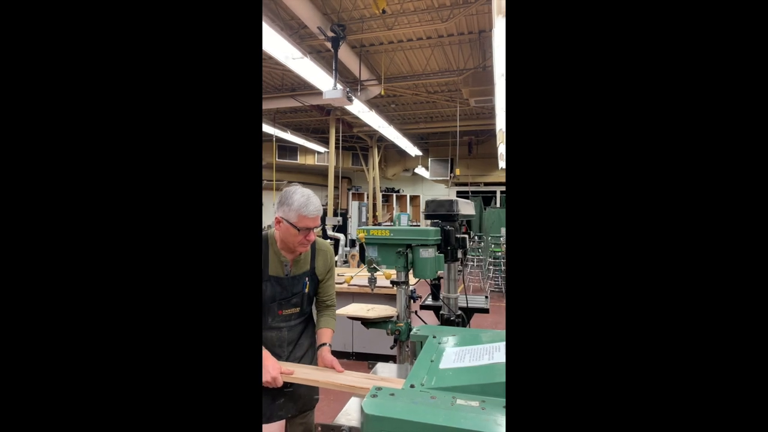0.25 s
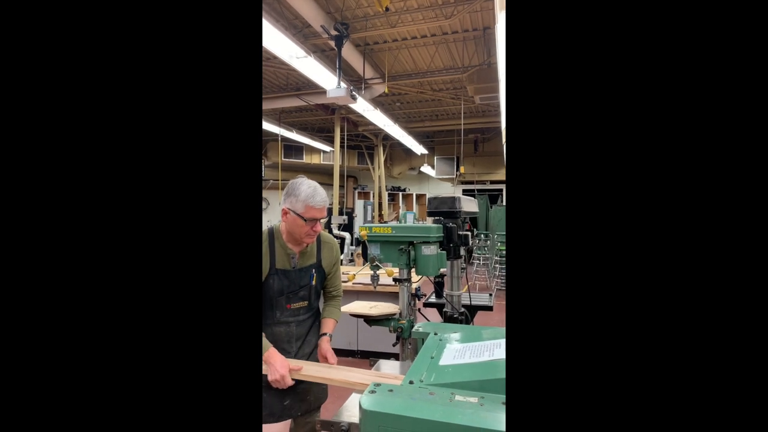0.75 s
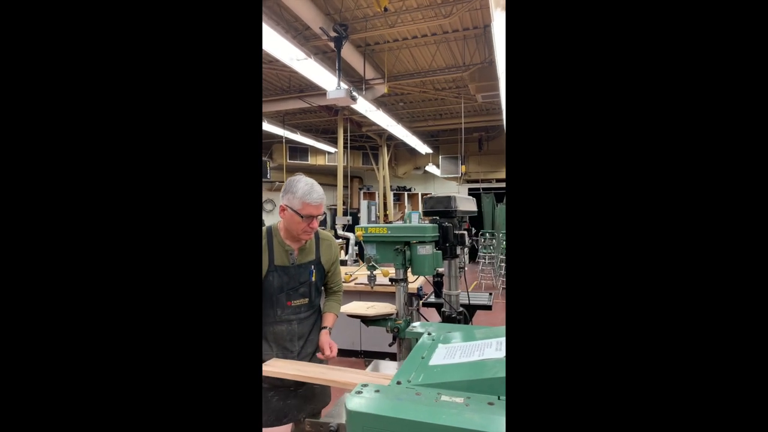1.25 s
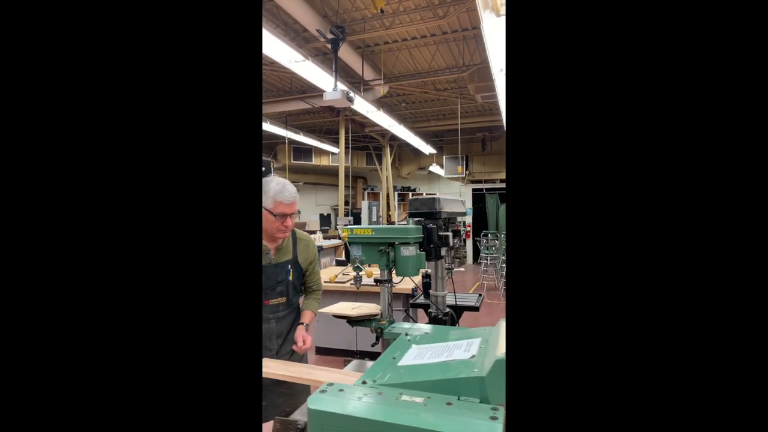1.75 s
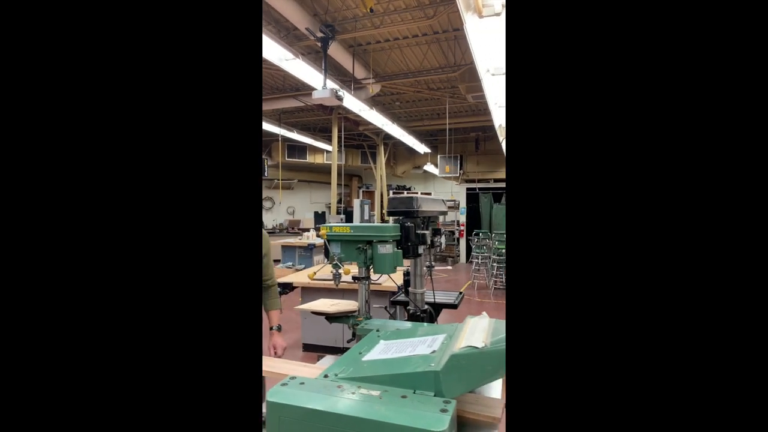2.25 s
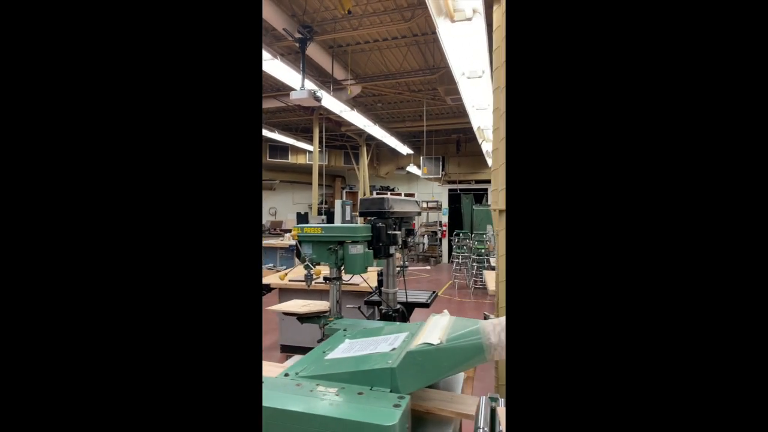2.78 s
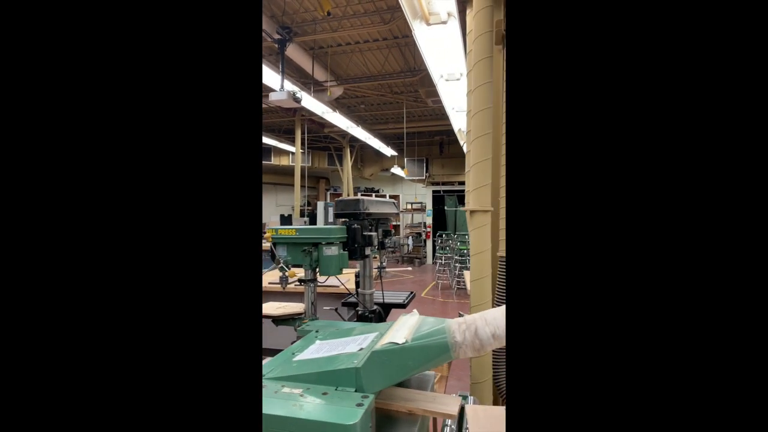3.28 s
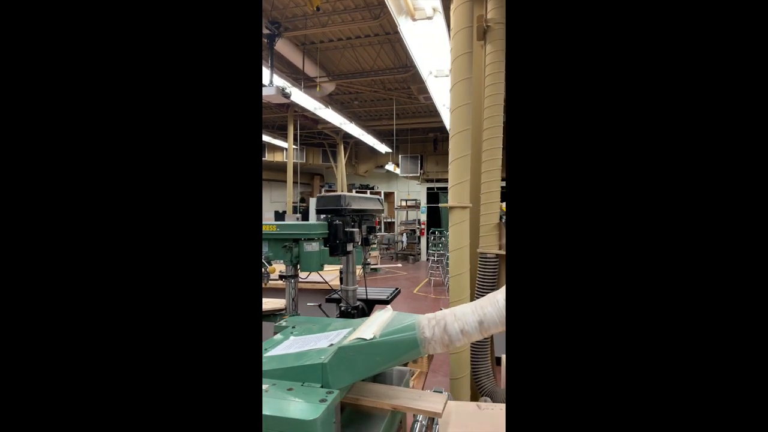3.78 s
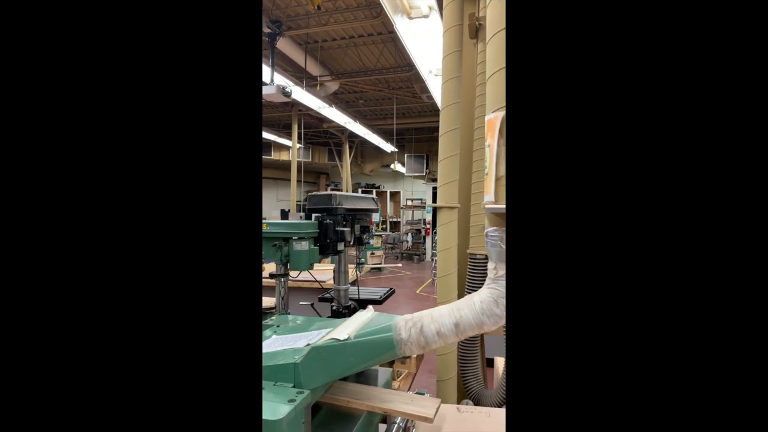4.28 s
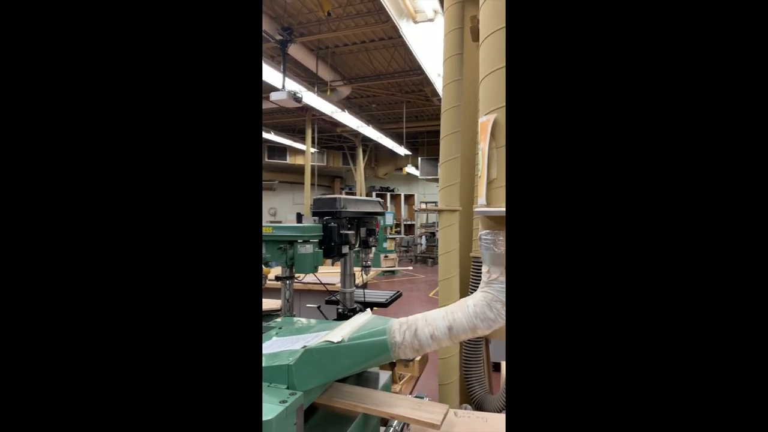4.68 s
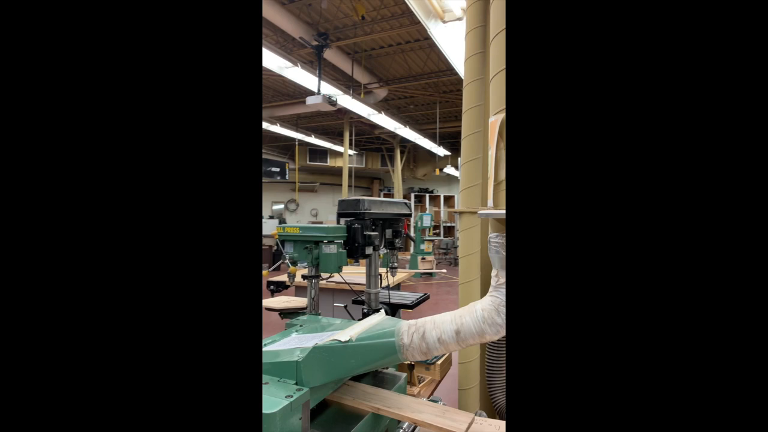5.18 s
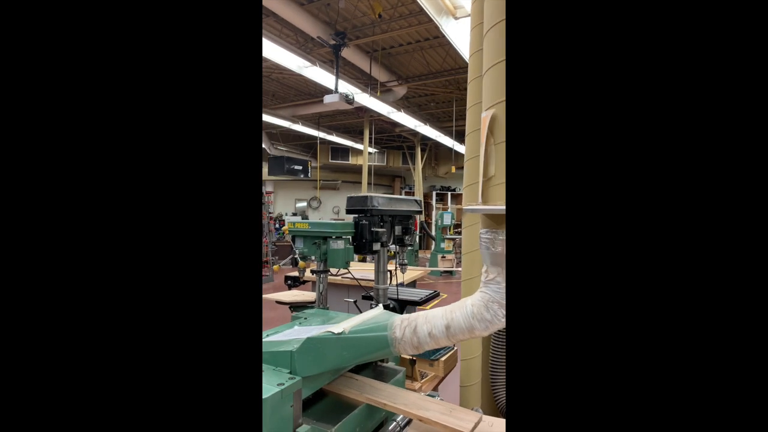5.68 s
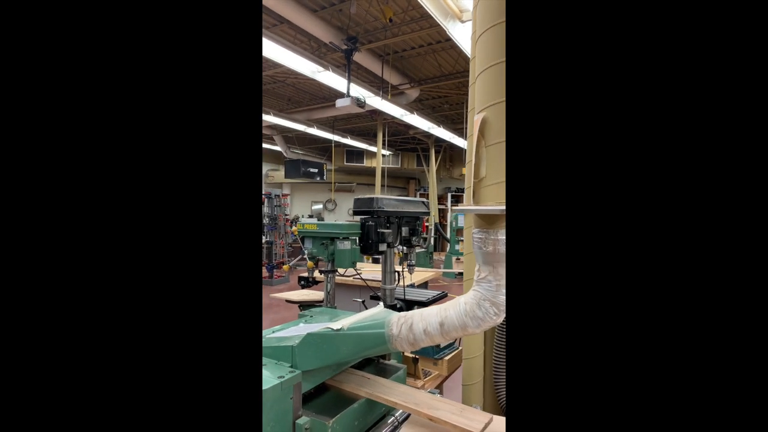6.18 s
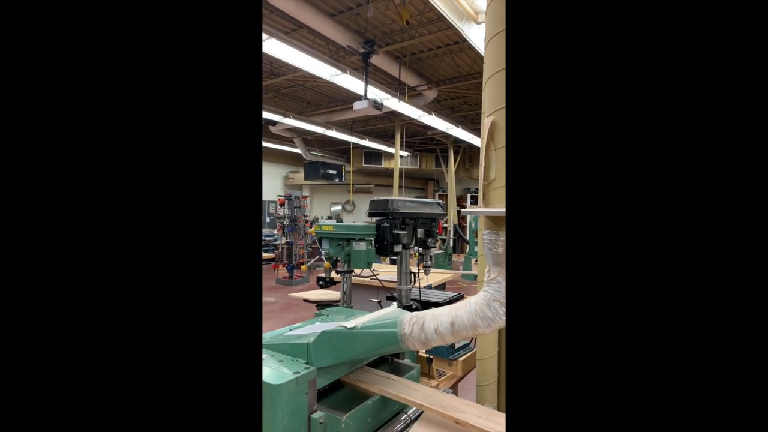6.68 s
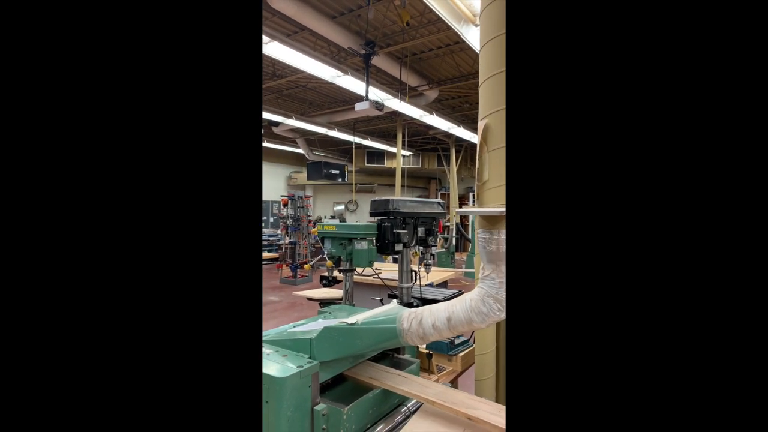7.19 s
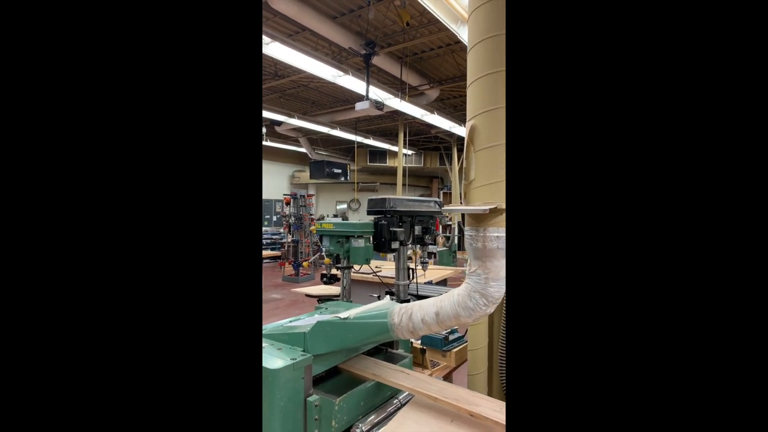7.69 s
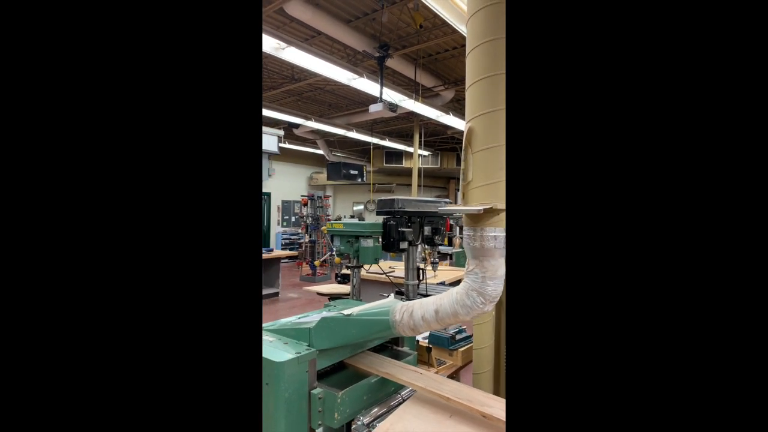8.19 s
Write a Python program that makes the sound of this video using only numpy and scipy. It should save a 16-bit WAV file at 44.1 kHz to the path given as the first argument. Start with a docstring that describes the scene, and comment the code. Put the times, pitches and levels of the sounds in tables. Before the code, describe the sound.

A thickness planer is already cutting a wooden board at the start and runs without a break for about eight and a half seconds, heard from a phone microphone moving beside it in a large workshop. The knives make a loud, buzzing drone of steady pitch over motor hum, rumble, ringing metal panels and a rasping, rapidly throbbing hiss. High whining tones fade in and out throughout. The drone swells and is strongest from about 2 to 3 seconds. Chips spray against the hood in short, bright bursts between 2 and 4 seconds; the hiss peaks near 3.3 seconds, and the strongest burst comes with a thin whistle just before 4. A smaller burst follows at about 5.3 seconds. The low drone and rumble then ease, and from about 7.5 seconds a higher tone stands out until the end.

```python
"""Thickness planer in a large workshop

Beside the machine, a phone microphone pans from the feed side to the outfeed as a board is cut.
Four unevenly set knives drone at four times the shaft rate and whine higher up, over motor hum,
ringing panels, rumble and hiss that throbs with the knives; chips spray through the hood.
The phone turns the phase of the treble between its two channels."""
import sys
import numpy as np
from scipy import signal
from scipy.fft import rfft, irfft, next_fast_len
from scipy.io import wavfile
from scipy.ndimage import uniform_filter1d, map_coordinates

SR = 44100
rng = np.random.default_rng(int(sys.argv[2]) if len(sys.argv) > 2 else 0)


def output_pcm(signal):
    """Save a mono or channel-first signal as 16-bit PCM at the path in sys.argv[1].

    Samples are clipped to [-1, 1] before scaling.
    """
    pcm = np.clip(np.atleast_2d(signal).T, -1, 1) * 32767
    wavfile.write(sys.argv[1], SR, np.round(pcm).astype(np.int16))


N = 372644
N_FFT = next_fast_len(N)
T = np.arange(N) / SR
F = np.arange(N_FFT // 2 + 1) * SR / N_FFT
SHAFT_HZ = 73.88

# orders (multiples of the shaft rate) that drone: the knife rate and three overtones
DRONE_ORDERS = (4, 8, 12, 16)
# higher orders that sing out in turn
WHINE_ORDERS = (14, 18, 20, 22, 24, 26, 28, 30, 32, 34, 38, 42, 46, 50, 54, 58)
# gain as the microphone pans: t/s, rumble/dB, body/dB, hiss/dB
AIM = [(0, 2, -4, -2.5), (.7, 5.5, -4, -1), (1.6, 4.5, -4, -3), (2.3, 4, -0.5, 2.5), (2.7, 4, -3, 1),
       (3.3, 1.5, -4, 5), (4.2, -0.5, -6.5, -0.6), (5.4, -1, -3.5, -1), (7.3, -2.5, -5, 0),
       (7.9, -2, -2, -2), (8.45, -3, -3, 0)]
RUMBLE_DB = np.interp(T, *np.transpose(AIM)[:2])


def undb(db):
    return 10 ** (np.asarray(db) / 20)


def unit(x):
    return x / np.sqrt(np.mean(x ** 2))


def curves(table):
    """The value columns of a (t/s, ...) table at every sample."""
    times, *columns = np.transpose(table)
    return [np.interp(T, times, column) for column in columns]


def at_hz(table, hz):
    """A (f/Hz, value) table read on a log axis."""
    freqs, values = np.transpose(table)
    return np.interp(np.log(hz + 1), np.log(freqs), values)


def walk(rate, step=32):
    """Random levels held 1 / rate seconds and smoothed twice; spread near 1."""
    hold = int(SR / step / rate)
    held = np.repeat(rng.standard_normal(N // step // hold + 2), hold)
    smooth = uniform_filter1d(uniform_filter1d(held, hold), hold)
    return 1.87 * np.interp(T * SR / step, np.arange(len(smooth)), smooth)


def swell(middle, half_length, db, t=T):
    """A bell-shaped rise and fall of amplitude."""
    return undb(db) * np.exp(-.5 * ((t - middle) / half_length) ** 2)


def resonance(spectrum, hz, width_hz):
    """The sound in a bell-shaped band of a spectrum, at rms 1."""
    bell = np.exp(-.5 * ((F - hz) / width_hz) ** 2)
    return unit(irfft(spectrum * bell, N_FFT)[:, :N])


def fading(waves, rate):
    """A tone (its sine and cosine) over scattered paths: level and phase drift at random."""
    return walk(rate) * waves[0] + walk(rate) * waves[1]


def hum():
    """Motor, roller and extractor tones waver in level and phase; the highest swells once."""
    # the tones: f/Hz
    tone_hz = (59.45, 119.3, 225.5, 243.9, 393, 452.7)
    # each tone: base level/dB, share of the rumble gain, level waver/dB, phase waver/turns
    tone_levels = [(-42.5, -0.43, 0, .01), (-50, 1.3, -0.7, .01), (-50, 1.6, 0.5, .03),
                   (-44.5, 0.74, 1.5, 0.023), (-48, 1.4, 4, 0.06), (-44, 0.5, 3, 0.06)]
    sizes = [undb(db + share * RUMBLE_DB) for db, share, _, _ in tone_levels]
    sizes[-1] += swell(middle=5, half_length=1.1, db=-42.5)
    tones = 0
    for hz, size, (_, _, waver_db, waver_turns) in zip(tone_hz, sizes, tone_levels):
        gain = size * undb(waver_db * walk(14))
        tones += gain * np.sin(2 * np.pi * (hz * T + rng.random() + waver_turns * walk(13)))
    return np.sqrt(2) * tones


def thrum(turns, beat_hz=1.19, in_phase_s=1.49):
    """The shaft's own tone; a slightly faster rotor beats against it and fades toward the outfeed."""
    # second rotor: t/s, level/dB
    rotor_levels = [(0, -41), (2.4, -45), (3.2, -45), (4.3, -65)]
    angle = 2 * np.pi * turns
    shaft = undb(-43 + .5 * RUMBLE_DB) * np.sin(angle)
    rotor = undb(curves(rotor_levels)[0]) * np.sin(angle + 2 * np.pi * beat_hz * (T - in_phase_s))
    return np.sqrt(2) * (shaft + rotor)


def housing(aim_share=1.15, flutter_db=1.4):
    """Noise rings in the hollow housing, loudest from the feed side; each resonance flutters alone."""
    # panel resonances: f/Hz, width/Hz, base level/dB
    panels = [(243, 12, -53), (375.3, 9.1, -48.5), (566, 1.8, -59), (678, 5, -54.5), (901, 67, -41),
              (1280, 114, -44.5), (1770, 81, -42.5)]
    air = rfft(rng.standard_normal((2, N_FFT)))
    ringing = sum(undb(db + flutter_db * walk(10)) * resonance(air, hz, width)
                  for hz, width, db in panels)
    return undb(aim_share * RUMBLE_DB) * ringing


def roar(turns, throb_depth=.22, flicker_db=1.0, rasp_db=2.2, fizz_db=1.0, surge_db=.45):
    """Rumble and hiss in bands that flicker, most in the rasping middle; the knives gate the highs."""
    # noise spectrum: f/Hz, base density/(dB per Hz)
    density = [(40, -81), (80, -70.0), (130, -66.5), (230, -63.0), (450, -59.5), (900, -59.0),
               (1300, -63.0), (2200, -66.0), (2700, -68), (3200, -68.5), (3900, -69), (4500, -71),
               (5400, -68.5), (6200, -66), (7000, -66.5), (9000, -69.0), (13000, -68.5), (16000, -72.5)]
    # where the rumble, body and hiss gains of AIM apply: f/Hz
    aim_hz = (178, 1160, 5860)
    spectrum = rfft(rng.standard_normal((2, N_FFT))) * undb(at_hz(density, F)) * np.sqrt(SR / 2)
    octaves = np.log2([100, 200, 400, 700, 1100, 1400, 1700, 2000, 2300, 2600, 2900, 3200, 3500, 3800,
                       4100, 4500, 5800, 7500, 9500, 12000, 15000])
    aim, surge, out = np.array(curves(AIM)), walk(17), 0
    throb = np.cos(8 * np.pi * turns) + .52 * np.cos(2 * np.pi * turns)  # knife rate and shaft rate
    for octave in octaves:
        share = np.interp(np.log2(F + 1), octaves, octaves == octave)
        band = irfft(spectrum * share, N_FFT)[:, :N]
        weights = np.array([np.interp(octave, np.log2(aim_hz), row) for row in np.eye(3)])
        if octave > np.log2(10000):
            weights *= .6  # the highest hiss follows the aim less
        bright = np.clip((octave - np.log2(600)) / 3, 0, 1)
        rasp = np.exp(-.5 * ((octave - np.log2(2600)) / .8) ** 2)
        gain_db = weights @ aim + flicker_db * walk(15) + bright * surge_db * surge
        gain_db += max(rasp * rasp_db, bright * fizz_db) * walk(55)
        gate = 1 + throb_depth * max(bright, .3 * rasp) * throb
        out += undb(gain_db) * gate * band
    return out


def chips(per_s=2500, spread_db=6.5, low_hz=5000, high_hz=6400, spray_db=-48, whistle_hz=6100):
    """Chips tick against the hood and ring it in two bands: a thin spray, bursts and a brief whistle."""
    # bursts: middle t/s, half length/s, peak/dB, f/Hz that sets the blend of the two bands
    bursts = [(2.196, 0.23, -38.5, 6400), (2.9, 0.24, -41, 6200), (3.157, 0.057, -31, 6100),
              (3.507, 0.039, -35, 5600), (3.865, 0.17, -26.5, 5070), (5.29, 0.12, -37, 6460)]
    # t/s, level/dB
    whistle_levels = [(3.2, -60), (3.35, -38), (3.6, -36), (3.9, -32), (4.1, -50), (4.2, -70)]
    hits = rng.random((2, N)) < per_s / SR
    sizes = undb(spread_db * np.minimum(rng.exponential(size=(2, N)), 4))
    ticks = rfft(hits * sizes * rng.choice([-1, 1], (2, N)), N_FFT)
    low, high = (resonance(ticks, hz, width_hz=500) for hz in (low_hz, high_hz))
    spray = undb(spray_db) * high
    for middle, half_length, db, hz in bursts:
        blend = np.clip((hz - low_hz) / (high_hz - low_hz), 0, 1)
        spray += swell(middle, half_length, db) * (np.sqrt(1 - blend) * low + np.sqrt(blend) * high)
    air = rfft(rng.standard_normal((2, N)), N_FFT)
    return spray + undb(curves(whistle_levels)[0]) * resonance(air, whistle_hz, width_hz=55)


def knife_blows(turns, order_range, changes_per_s, scatter, stray=.08, turn_samples=4096):
    """Four uneven blows a turn buzz at the shaft's orders, over a direct path and changing ones."""
    # knife seats: offset from even quarter turns/turns
    seats = (0, .0096, .0032, -.0064)
    # spectrum of a blow: f/Hz, level/dB
    blow = [(150, -33), (520, -43), (700, -38), (960, -42), (1100, -51), (1500, -48), (2300, -53),
            (3500, -50), (4300, -54), (4600, -46), (4900, -49), (5500, -49), (6100, -47), (6600, -51),
            (8000, -49), (11000, -51.5), (15000, -54.5)]
    orders = np.arange(*order_range)
    seat_turns = np.arange(len(seats)) / len(seats) + seats
    comb = np.abs(np.mean([np.exp(-2j * np.pi * orders * at) for at in seat_turns], axis=0))
    free = ~np.isin(orders, (1, *DRONE_ORDERS, *WHINE_ORDERS))  # not in the thrum, drone or whine
    size = undb(at_hz(blow, orders * SHAFT_HZ)) * (comb + stray) * free  # stray reaches every order
    shape = (int(N / SR * changes_per_s) + 3, len(orders))
    direct = np.exp(2j * np.pi * rng.random(len(orders)))
    fields = []
    for _ in range(2):
        paths = rng.standard_normal(shape) + 1j * rng.standard_normal(shape)
        spectra = np.pad(size * (direct + scatter * paths), ((0, 0), (orders[0], 0)))
        cycles = irfft(spectra, turn_samples) * turn_samples / 2  # each row is one turn of the shaft
        cycles = np.hstack([cycles, cycles[:, :1]])
        fields.append(map_coordinates(cycles, [T * changes_per_s, turns % 1 * turn_samples], order=1))
    return np.array(fields)


def whine(turns, fades_per_s=10, flutter_db=2.5):
    """High even orders of the shaft fade at random and now and then sing out; left and right."""
    # each order's usual part in step between the channels: level/dB
    in_step_db = (-60, -55, -53, -55, -56, -57, -57, -60, -60, -59, -63, -62, -59, -60, -60, -72)
    # and its opposed part: level/dB
    opposed_db = (-63, -62, -62, -58, -57, -56, -55, -56, -54, -55, -55, -55, -54, -55, -54, -55)
    # each order's swells: middle t/s, half length/s, peak in step/dB, peak opposed/dB
    order_swells = [
        [(5.64, 0.21, -49, -53), (7.98, 0.14, -40, -64)],
        [(2.12, 0.39, -38, -60), (5.5, 0.62, -42.5, -60), (8.24, 0.089, -42, -49)],
        [(0.57, 0.2, -47, -57), (1.23, 0.16, -41, -60), (1.78, 0.12, -39, -46), (2.94, 0.21, -41, -48),
         (5.16, 0.37, -42.5, -60), (7.42, 0.4, -45.5, -60)],
        [(1.22, 0.23, -43.5, -60), (2.12, 0.23, -40, -60)],
        [(1.42, 0.16, -46, -43), (2.1, 0.18, -52, -46)],
        [(8.2, 0.32, -42, -52)],
        [(1.46, 0.55, -42.5, -52), (2.46, 0.096, -44, -51), (2.8, 0.13, -48, -46), (3.22, 0.22, -48, -46),
         (6.31, 0.73, -49.5, -50), (7.7, 0.11, -40, -49), (8.26, 0.08, -43, -48)],
        [(0.74, 0.23, -58, -46), (1.12, 0.12, -61, -45), (2.04, 0.41, -45.5, -52), (2.64, 0.18, -45, -40),
         (3.26, 0.29, -48, -44), (6.16, 0.15, -44.5, -46), (7.75, 0.15, -48, -47)],
        [(1.03, 1, -66, -47), (5.84, 0.15, -49, -48), (7.16, 0.2, -56, -42), (7.98, 0.1, -45, -42)],
        [(0.35, 0.3, -54, -46), (1.76, 0.7, -50.5, -48), (1.91, 0.38, -61, -47), (2.8, 0.19, -50, -45),
         (6.39, 0.33, -69, -44), (8.04, 0.37, -55, -42), (8.27, 0.14, -56, -43)],
        [(0.25, 0.15, -41, -39), (1.96, 0.14, -58, -41), (3.24, 0.2, -46, -42), (5.1, 0.2, -44, -40),
         (5.8, 0.15, -48, -40), (6.32, 0.2, -64, -40), (8.0, 0.18, -61, -47)],
        [(1.56, 0.16, -63, -40), (3.16, 0.18, -53, -43), (4.45, 0.19, -45, -39), (8.14, 0.12, -61, -38)],
        [(0.6, 0.074, -41, -39), (1.38, 0.18, -50, -42), (3.2, 0.57, -41.5, -34), (4.6, 0.056, -41, -48),
         (6.72, 0.28, -52, -46), (7.35, 0.12, -49, -46), (7.8, 0.35, -40.5, -41)],
        [(0.74, 0.32, -48, -45), (2.38, 0.1, -61, -43), (3.22, 0.21, -50, -43), (4.29, 0.12, -42.5, -45),
         (5.03, 0.12, -60, -43), (5.4, 0.087, -42, -41), (5.75, 0.14, -41.5, -44), (6.52, 0.15, -45.5, -43),
         (7.16, 0.23, -49, -47), (8.27, 0.18, -43, -45)],
        [(0.82, 0.11, -45, -44), (2.68, 0.2, -50, -48), (3.1, 0.1, -48, -40), (4.64, 0.46, -49, -45),
         (6.92, 0.12, -49, -47), (7.87, 0.77, -46.5, -45)],
        [(0.39, 0.22, -58, -46), (3.24, 0.24, -56, -38), (4.77, 0.34, -61, -47), (5.6, 0.2, -51, -48)],
    ]
    parts, coarse_t = np.zeros((2, N)), T[::256]
    turns = turns + .0013 * walk(40)  # uneven cuts roughen the tones
    for order, *usual_db, swells in zip(WHINE_ORDERS, in_step_db, opposed_db, order_swells):
        angle = 2 * np.pi * (order * turns + rng.random())
        waves = undb(flutter_db * walk(35)) * np.array([np.sin(angle), np.cos(angle)])
        parts += [undb(db) * fading(waves, fades_per_s) for db in usual_db]
        sung = sum(swell(middle, half_length, np.array(peak_db)[:, None], coarse_t)
                   for middle, half_length, *peak_db in swells)
        parts += np.sqrt(2) * waves * [np.interp(T, coarse_t, part) for part in sung]
    in_step, opposed = parts
    return np.array([in_step + opposed, in_step - opposed])


def drone(turns, skew=.12, rumble_share=.8):
    """The knives strike the board: the knife-rate tone and three overtones, left and right."""
    # knife-rate tone along the pan: t/s, level/dB, left minus right/dB
    fundamental = [(0.0, -28, 2), (0.04, -27.5, 2.5), (1.39, -23.5, 1.5), (1.84, -20, 1.5), (3.18, -19, 1),
                   (3.69, -22.5, 1.5), (5.27, -25.5, 5.5), (6.07, -31, 6.5), (6.4, -28, 3),
                   (6.61, -31, 4.5), (7.48, -32.5, 5), (7.58, -37.5, -4), (7.72, -33, -5),
                   (7.95, -35.5, -7), (8.19, -31.5, -3.0), (8.45, -32, -3)]
    # a curve for each overtone as the microphone crosses standing waves: t/s, level/dB
    overtones = [
        [(0, -63), (.6, -51), (.9, -36), (1.5, -35), (1.9, -28.5), (2.3, -26.5), (2.6, -30.5), (3, -30),
         (3.15, -38.5), (4, -42.5), (4.4, -32.5), (5, -50), (5.9, -53), (6.6, -40.5), (7.5, -33.5), (8.45, -31)],
        [(0, -54), (.5, -36), (1.3, -33.5), (1.6, -46), (1.9, -34), (3.1, -32.5), (3.7, -38.5), (4.2, -41.5),
         (5.4, -43), (5.8, -35), (6.1, -42.5), (6.7, -31.5), (7.2, -43.5), (8.1, -37), (8.45, -40)],
        [(0, -38), (.5, -45), (.9, -37.5), (1.2, -43), (1.7, -38.5), (3.6, -32), (4.2, -35), (4.6, -60),
         (5.2, -39.5), (7.1, -33.5), (7.42, -39), (7.6, -25), (7.85, -27.5), (8.03, -27), (8.12, -32),
         (8.22, -29.5), (8.45, -27.5)],
    ]
    # each order: flutter/dB
    flutters = (.3, 1.2, 1.8, 1.5)
    level_db, pan_db = curves(fundamental)
    levels = [level_db] + [curves(table)[0] for table in overtones]
    angles = [2 * np.pi * (order * turns + rng.random()) for order in DRONE_ORDERS]
    sizes = [np.sqrt(2) * undb(db + flutter * walk(20)) for db, flutter in zip(levels, flutters)]
    in_step = sum(size * np.sin(angle) for size, angle in zip(sizes, angles))
    # the opposed part pans the fundamental and sets each tone a little out of step between channels
    lean = np.tanh(pan_db * np.log(10) / 40)
    opposed = sizes[0] * (lean * np.sin(angles[0]) + skew * walk(1.72) * np.cos(angles[0]))
    for db, angle in zip((-42, -45, -45), angles[1:]):
        opposed += undb(db + rumble_share * RUMBLE_DB) * fading((np.sin(angle), np.cos(angle)), rate=1.5)
    return np.array([in_step + opposed, in_step - opposed])


def microphone_pair(fields, start_hz=2510, half_turn_hz=2125, dwell=.34, ease=.7):
    """Two sound fields become left and right; up the treble, bands sound alternately centred and wide."""
    # stereo width below the treble: f/Hz, opposed minus in step/dB
    width = [(60, -59), (110, -24), (200, -19.5), (380, -15), (700, -5.5), (1400, -15.5), (2400, 4.5),
             (3600, -3), (4200, 9)]
    half_turns = np.maximum(F - start_hz, 0) / half_turn_hz
    offset = 2 * ((half_turns + .5) % 1) - 1
    rise = np.clip((np.abs(offset) - dwell) / (1 - dwell), 0, 1) ** ease
    stair = np.round(half_turns) + .5 * np.sign(offset) * rise  # treble bands alternate between centred and wide
    treble = np.clip((F - 3900) / 700, 0, 1)
    angle = treble * stair * np.pi / 2 + (1 - treble) * np.arctan(undb(at_hz(width, F)))
    likeness = np.interp(treble, (0, 1), (.3, .68))
    first, second = rfft(fields, N_FFT)
    in_step = np.cos(angle) * first
    opposed = np.sin(angle) * (1j * likeness * first + np.sqrt(1 - likeness ** 2) * second)
    return irfft([in_step + opposed, in_step - opposed], N_FFT)[:, :N]


def scene(slow_from_s=6.1, slow_by_hz=.045):
    """One shaft times the knives; it hunts under the cut and later runs a shade slower."""
    turns = SHAFT_HZ * T - slow_by_hz * np.maximum(T - slow_from_s, 0)
    turns = turns + .0044 * walk(6) + .001 * walk(40)
    buzz = knife_blows(turns, order_range=(1, 102), changes_per_s=7, scatter=1.01)
    # each blow breaks the wood differently, which blurs the highest orders
    sizzle = knife_blows(turns, order_range=(102, 213), changes_per_s=50, scatter=1.9)
    tones = drone(turns) + whine(turns)
    fields = buzz + sizzle + thrum(turns) + hum() + housing() + roar(turns) + chips()
    return tones + microphone_pair(fields)


def record(dry, top_hz=15740):
    """The phone cuts the top of the treble steeply."""
    return signal.sosfilt(signal.ellip(14, .2, 70, top_hz, fs=SR, output="sos"), dry)


dry = scene()
out = record(dry)
output_pcm(out)
```